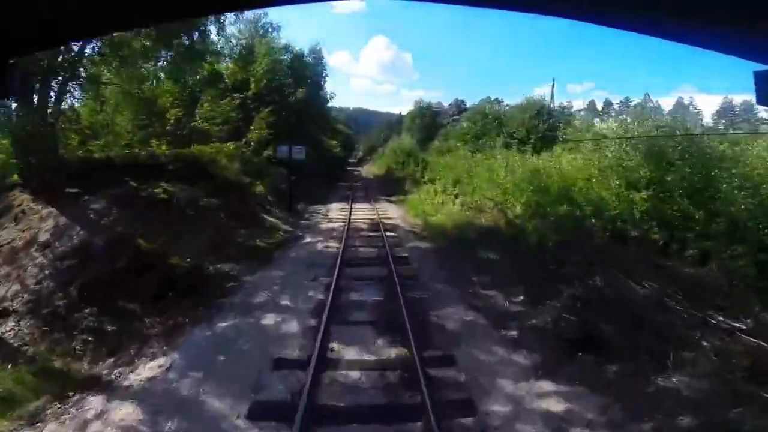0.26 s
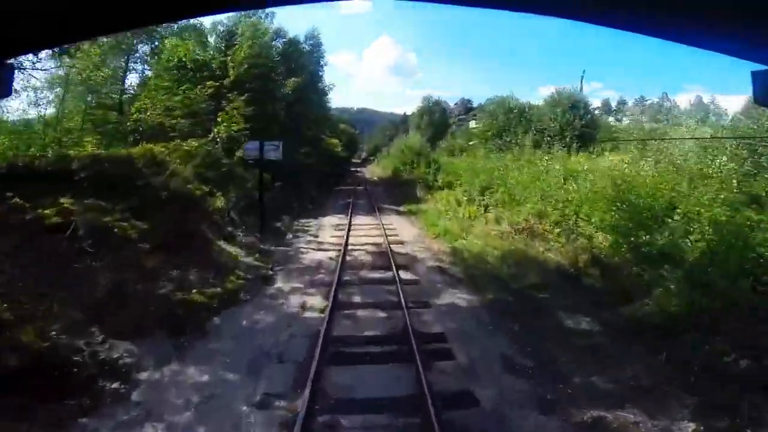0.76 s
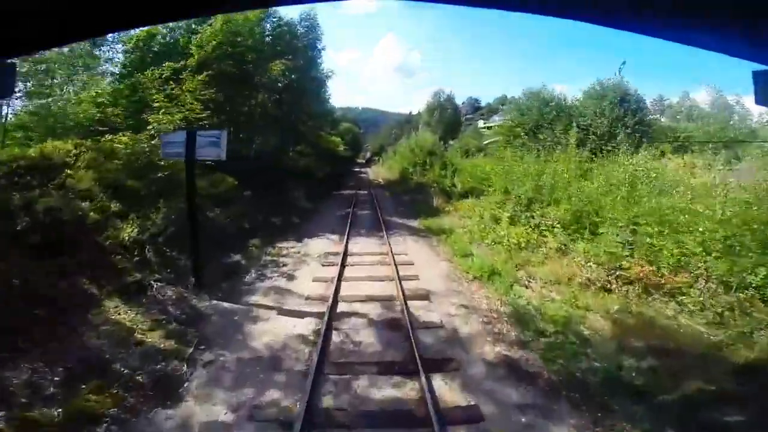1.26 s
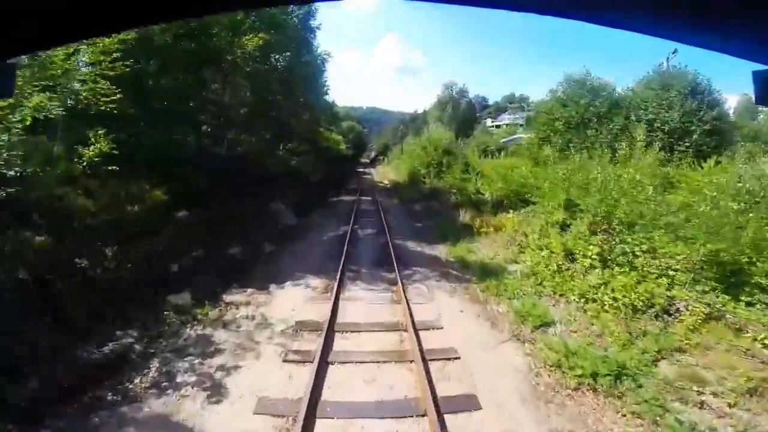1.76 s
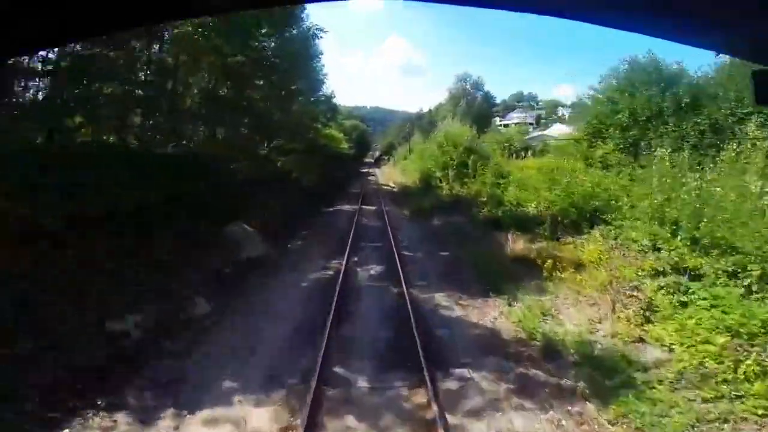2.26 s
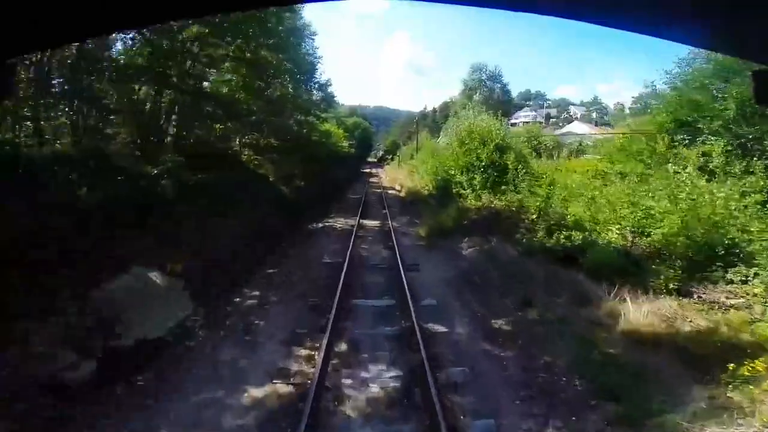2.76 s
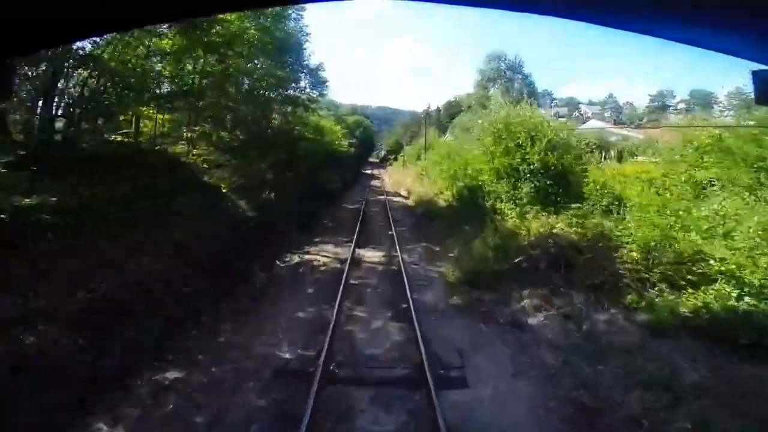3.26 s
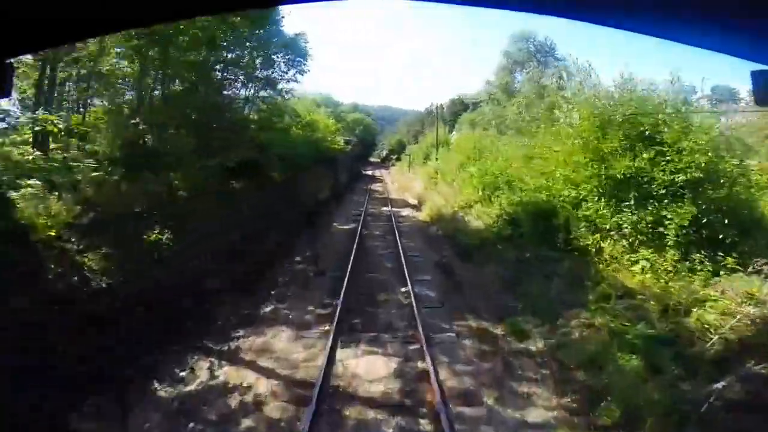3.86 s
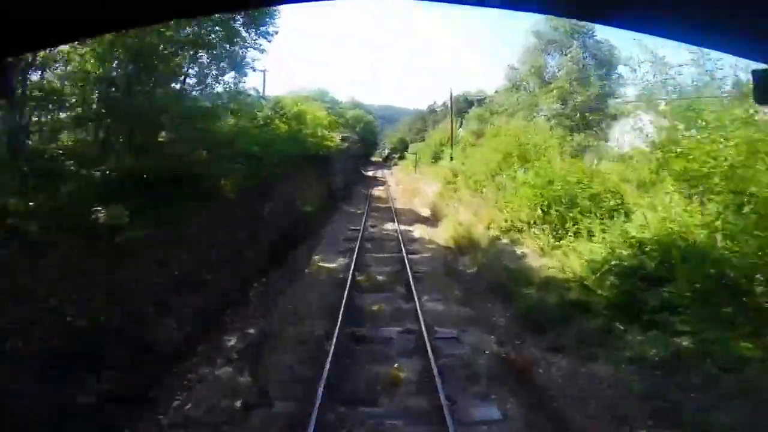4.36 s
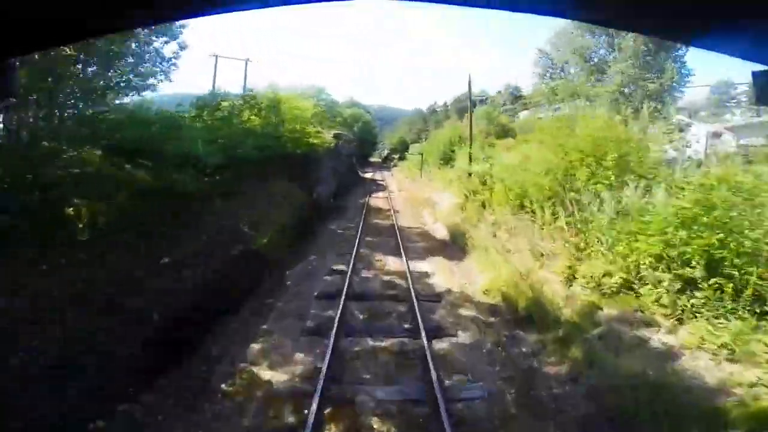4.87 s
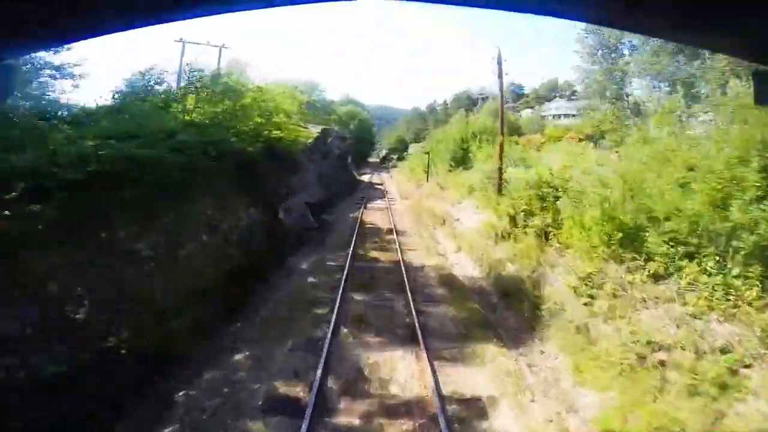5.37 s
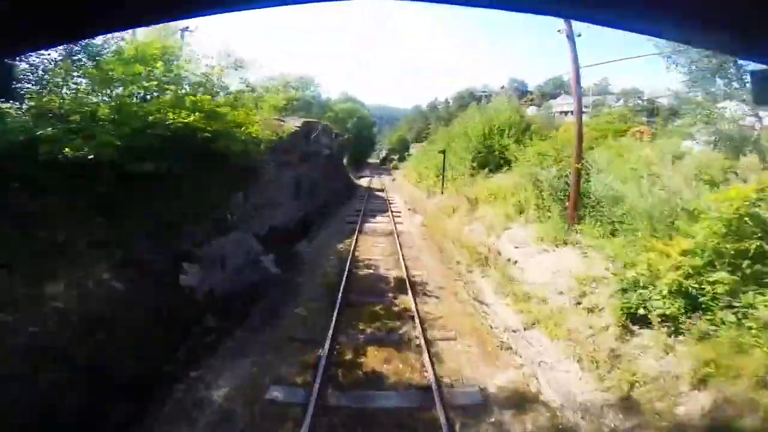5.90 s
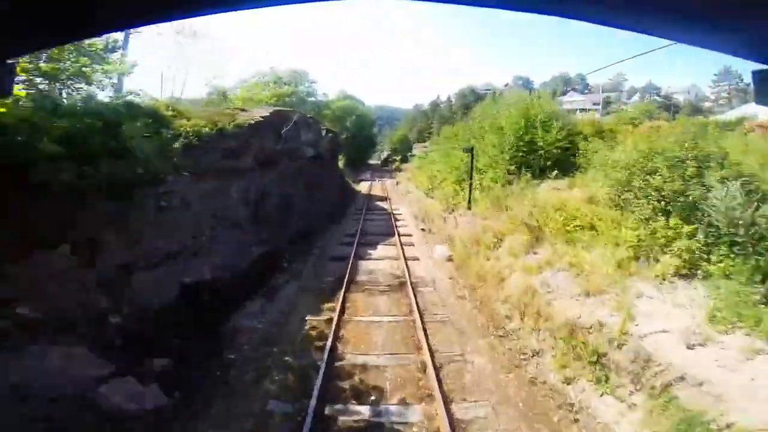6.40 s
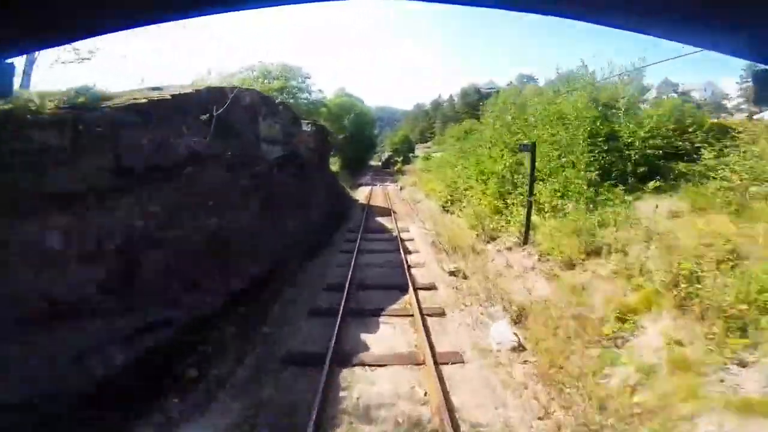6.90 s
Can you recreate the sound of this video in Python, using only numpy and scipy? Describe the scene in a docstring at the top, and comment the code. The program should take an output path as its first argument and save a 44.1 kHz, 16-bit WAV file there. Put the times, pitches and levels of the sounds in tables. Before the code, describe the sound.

Heard inside a small locomotive cab, the engine throbs in seven to eight rough, uneven beats a second, slowly quickening. Low frame rumble and wandering panel booms fill in beneath. Three loud, short metallic clacks mark rail joints near the start, middle and later part. The close microphone sounds boxy and coloured, mono, with little high treble.

```python
"""The engine of a small locomotive gaining a little speed, heard inside the cab: seven to eight beats a second,
four uneven beats to a turn, each a burst of noise coloured by the resonances of cab and microphone housing.
Rolling shakes the frame into a rumble, floor and wall panels boom and hum, and a deep thrum wanders in pitch.
A wheel clacks over each rail joint as damped modes; small fittings tick as puffs of noise, and one squeak
glides upward. A faint electrical pair of tones whines throughout."""
import sys
import numpy as np
from scipy import signal
from scipy.fft import rfft, irfft, next_fast_len
from scipy.io import wavfile
from scipy.ndimage import uniform_filter1d, minimum_filter1d

SR = 44100
rng = np.random.default_rng(int(sys.argv[2]) if len(sys.argv) > 2 else 0)


def rack_gain(trim_db):
    """Turn a fader trim in dB into the linear factor to multiply a signal by."""
    fader = np.asarray(trim_db, float)
    return 10 ** (fader / 20)


def store_wav(level_fs):
    """Save 16-bit WAV to argv[1]."""
    pcm = np.round(np.clip(np.atleast_2d(level_fs), -1, 1) * 32767)
    wavfile.write(sys.argv[1], SR, pcm.T.astype(np.int16))


N = 314874  # length of the scene [samples]


def evened(x):
    """Normalisation: scales a signal to unit rms."""
    return x / np.sqrt(np.mean(x ** 2) + 1e-20)


def add(mix, s, sound):
    """Superposition: adds a sound to the mix from time s [s]."""
    part = mix[round(s * SR):][:len(sound)]
    part += sound[:len(part)]


def sine(hz):
    """Phase is the integral of frequency: a sine of unit rms and random starting phase follows hz(t)."""
    return np.sqrt(2) * np.sin(2 * np.pi * (np.cumsum(hz) / SR + rng.random()))


def peaks(modes, hz):
    """Modal summation: gain of steep resonances (centre [Hz], width [Hz], level [dB]) whose powers add."""
    power = 0
    for centre, width, db in modes:
        detuning = 2 * (hz - centre) / width
        power = power + (rack_gain(db) / (1 + detuning ** 2)) ** 2
    return np.sqrt(power)


def colour(x, gain_at):
    """Minimum-phase filtering: the gain gain_at(hz) fixes the phase, so ringing only follows its input."""
    size = next_fast_len(len(x) + SR)
    log_gain = np.log(gain_at(abs(np.fft.fftfreq(size, 1 / SR))) + 1e-7)
    causal = np.exp(np.conj(signal.hilbert(log_gain)))  # the Hilbert transform of log gain is the phase
    return irfft(rfft(x, size) * causal[:size // 2 + 1], size)[:len(x)]


def beat_shapes(t, beat_s):
    """Pulsed excitation: power envelope of each beat, one row each, a quick swell and a slower fade."""
    rise_s, fall_s = .02, .03
    u = t - beat_s[:, None]
    return np.exp(-.5 * (u / np.where(u < 0, rise_s, fall_s)) ** 2)


def shaken(modes, db, lag_s, follow, beat_s, beat_db):
    """Forced vibration: rolling noise, swelling lag_s after each beat, drives resonances to an rms level db."""
    t = np.arange(0, N / SR + .01, .005)
    push = rack_gain(beat_db[:, 0]) @ beat_shapes(t - lag_s, beat_s)
    push = np.interp(np.arange(N) / SR, t, push)
    shake = rng.standard_normal(N) * (1 + follow * push)
    return rack_gain(db) * evened(colour(shake, lambda hz: peaks(modes, hz)))


def wander():
    """Low-pass filtered noise: a slow random drift of unit rms."""
    span = round(.06 * SR)  # pace of the drift
    drift = uniform_filter1d(rng.standard_normal(N), span, mode="wrap")
    return evened(uniform_filter1d(drift, span, mode="wrap"))


def booming(swells, rest_hz, rest_db, wander_hz, wander_db):
    """Power-weighted frequency: a wandering panel tone takes on level and pitch of each swell (rise, hold, fade)."""
    rise_s, fall_s = .014, .0257
    t = np.arange(N) / SR
    power = rack_gain(rest_db + wander_db * wander()) ** 2
    pull = power * (rest_hz + wander_hz * wander())
    for start, db, hz, length in swells:
        early = np.minimum(t - start - rise_s, 0) / rise_s
        late = np.maximum(t - start - length + fall_s, 0) / fall_s
        swell = rack_gain(db) ** 2 * np.exp(-early ** 2 - late ** 2)
        power = power + swell
        pull = pull + swell * hz
    return np.sqrt(power) * sine(pull / power)


def tick(db, hz, width, length):
    """Impulsive noise: a fading puff rings one broad resonance, its peak at level db."""
    t = np.arange(SR // 10) / SR
    puff = rng.standard_normal(len(t)) * np.sqrt(t / length) * np.exp(-t / length)
    puff = colour(puff, lambda f: peaks([(hz, width, 0)], f))
    return rack_gain(db) * puff / abs(puff).max()


def electrical_whine():
    """Steady pure tones: a close pair of sines beats at the difference of its frequencies."""
    # faint electrical pair: (frequency [Hz], rms level [dB])
    whine_tones = [(11687, -89), (11719, -87)]
    t = np.arange(N) / SR
    return sum(np.sqrt(2) * rack_gain(db) * np.sin(2 * np.pi * hz * t) for hz, db in whine_tones)


def deep_thrum():
    """Frequency and amplitude modulation: one low panel mode wanders in pitch, swelling and sagging."""
    # path of the thrum: (time [s], frequency [Hz], rms level [dB])
    thrum_path = [(.1, 31.5, -28), (.3, 33, -31), (.45, 33, -24), (.6, 34, -34), (1.2, 31.5, -26),
                  (1.4, 31.8, -29), (2.05, 31.7, -26), (2.5, 35, -34), (2.9, 31.8, -26), (3.4, 30.4, -35),
                  (3.85, 31.7, -27), (4.5, 31, -25), (5.07, 31.5, -27), (5.25, 34.5, -33), (5.75, 33, -34),
                  (6.2, 33.5, -28), (7, 32.5, -26)]
    s, hz, db = np.transpose(thrum_path)
    t = np.arange(N) / SR
    return rack_gain(np.interp(t, s, db)) * sine(np.interp(t, s, hz))


def frame_rumble(beat_s, beat_db):
    """Forced vibration of many modes: the rolling wheels shake the frame, a little more after each beat."""
    # resonances of the frame: (centre [Hz], width [Hz], relative level [dB])
    frame_modes = [(29.5, 1.3, -2), (80.5, 105, -4), (134, 150, -6), (199.9, 27.8, -1.5), (229.2, 34, -1),
                   (253, 10, -5), (321.8, 65, -14), (381.8, 48, -10), (438.3, 56, -16), (549.6, 41, -25.5)]
    return shaken(frame_modes, -18, .015, .79, beat_s, beat_db)


def ringing_panels(beat_s, beat_db):
    """Narrow-band resonance: panels ring from the shaking between and under the booms and hums."""
    # panel modes: (centre [Hz], width [Hz], rms level [dB], lag after a beat [s], swell with a beat [factor])
    panel_modes = [(104, 12, -27, .04, 1.2), (249, 9, -30, .025, 1.1)]
    ringing = 0
    for hz, width, db, lag_s, follow in panel_modes:
        ringing = ringing + shaken([(hz, width, 0)], db, lag_s, follow, beat_s, beat_db)
    return ringing


def wall_hum():
    """Modulated panel mode: the wall panel hums at a wandering pitch, with louder swells."""
    # loudest swells of the wall panel: (start [s], rms level [dB], frequency [Hz], length [s])
    hum_swells = [(.04, -19, 246.6, 0.052), (0.393, -19, 249.3, .08), (0.914, -20.5, 248.2, 0.067),
                  (1.109, -20, 240, 0.034), (1.181, -21.5, 250.2, 0.088), (1.57, -22.5, 237, 0.064),
                  (1.685, -16, 236.2, .055), (2.405, -20, 245.8, 0.078), (2.64, -20, 232.3, 0.084),
                  (3.329, -15.5, 237.8, 0.075), (3.572, -18, 236.7, 0.051), (3.8, -15, 242.1, 0.043),
                  (3.902, -17, 239, 0.057), (4.201, -20, 242.4, 0.049), (5.389, -18, 235.6, 0.071),
                  (5.939, -21, 244.6, 0.05)]
    return booming(hum_swells, rest_hz=250.5, rest_db=-31, wander_hz=2, wander_db=3)


def floor_boom():
    """Modulated panel mode: the floor sounds a low wandering tone that swells into booms."""
    # loudest booms of the floor panel: (start [s], rms level [dB], frequency [Hz], length [s])
    boom_swells = [(0.244, -14.5, 103.7, 0.044), (0.536, -21.5, 112, 0.092), (0.707, -16.5, 100.8, 0.19),
                   (0.903, -13.5, 104.6, 0.107), (1.099, -16, 101.8, 0.069), (1.284, -17, 115.3, 0.099),
                   (1.949, -15.5, 103.6, 0.052), (2.101, -9.5, 102, 0.15), (2.534, -16.5, 104.9, 0.078),
                   (2.809, -11.5, 104.5, 0.055), (2.968, -16, 101.8, 0.06), (3.099, -14.5, 106.3, 0.17),
                   (3.402, -15.5, 98.7, 0.08), (3.499, -13.0, 102.6, 0.15), (3.783, -13, 108.4, 0.069),
                   (3.874, -13.7, 108.2, 0.085), (4.345, -8, 105, 0.033), (4.467, -11, 106.7, 0.055),
                   (4.883, -11.5, 104.4, 0.062), (5.004, -17.5, 107.4, 0.04), (5.353, -11.5, 99, 0.08),
                   (5.53, -13.5, 105.9, 0.045), (5.732, -15.5, 100.1, 0.098), (6.054, -18, 103.7, 0.12),
                   (6.496, -15, 111, 0.054), (6.569, -16, 103.2, 0.083), (7.068, -14, 103.6, 0.1)]
    return booming(boom_swells, rest_hz=104, rest_db=-23, wander_hz=3.5, wander_db=3.5)


def add_fittings(mix):
    """Impulsive excitation: loose fittings give short ticks of noise."""
    # ticks: (time [s], peak level [dB], centre [Hz], width [Hz], length [s])
    fitting_ticks = [(.161, -28, 3100, 500, .004), (.161, -32, 4000, 700, .006),
                     (.161, -39, 6000, 3000, .007), (.161, -55, 10000, 5000, .005),
                     (.695, -23, 760, 120, .01), (4.4972, -35, 10000, 9000, .0005)]
    for s, *row in fitting_ticks:
        add(mix, s, tick(*row))


def add_squeak(mix):
    """Exponential frequency glide: a short rising tone leaves a faint tail of narrow-band noise."""
    # the squeak: (time [s], peak level [dB], from [Hz], to [Hz], rise [s], tail re tone [dB], tail t60 [s])
    squeak_row = (3.5935, -32, 8200, 8550, .0035, -23, .17)
    s, db, from_hz, to_hz, rise_s, tail_db, t60 = squeak_row
    t = np.arange(SR // 5) / SR
    hz = to_hz + (from_hz - to_hz) * np.exp(-t / rise_s)
    envelope = (t / rise_s) ** 2 * np.exp(2 - 2 * t / rise_s)  # peaks at 1 after rise_s
    tone = envelope * np.sin(2 * np.pi * np.cumsum(hz) / SR)
    tail = evened(colour(rng.standard_normal(len(t)), lambda f: peaks([(to_hz, 300, 0)], f)))
    add(mix, s, rack_gain(db) * (tone + tail * rack_gain(tail_db - 60 * t / t60)))


def clack():
    """Modal impact: one blow rings the wheel, its modes in step at the peak and beating afterwards."""
    # modes of the wheel: (frequency [Hz], relative level [dB], undamped t60 [s])
    wheel_modes = [(1950, -12, .06), (2155, 0, .2), (2358, -2, .16), (2505, -7, .08), (2620, -10, .06),
                   (2740, -8, .08), (2900, -14, .04), (3400, -21, .15), (5800, -26, .25)]
    peak_s = .0017
    t = np.arange(SR // 10) / SR
    ring = 0
    for hz, db, t60 in wheel_modes:
        ring = ring + rack_gain(db - 60 * t / t60) * np.cos(2 * np.pi * hz * (t - peak_s))
    ring *= np.sin(np.pi / 2 * np.minimum(t / peak_s, 1)) ** 2
    ring *= rack_gain(-1800 * np.maximum(t - .0115, 0))  # damped [dB/s] once the wheel sits on the next rail
    return ring / abs(ring).max()


def add_rail_joints(mix):
    """Impact and friction: at each rail joint the ringing blow comes with scraped noise."""
    # blows: (time [s], peak level of the ring [dB])
    joint_blows = [(.5812, -3.5), (3.0735, -4.5), (5.5983, -3)]
    # scrape in each blow: (peak level re ring [dB], centre [Hz], width [Hz], length [s])
    scrape_bands = [(-17, 2400, 450, .006), (-39, 6000, 2000, .004)]
    for s, db in joint_blows:
        scrape = sum(tick(*row) for row in scrape_bands)
        add(mix, s, rack_gain(db) * (clack() + scrape))


def beats():
    """Phase integration: speed sets the time of every beat; stroke, effort and chance set its strength."""
    # engine speed, rising gently: (time [s], speed [turns/s])
    speed_curve = [(0, 1.7128), (1.8, 1.7588), (3.6, 1.8204), (5.4, 1.8975), (7.2, 1.9902)]
    # four beats of a turn, weak to strong: (place in the turn [0-1], roar [dB], ring [dB], hiss [dB])
    turn_strokes = [(.135, -3.5, -4, -4), (.380, -1.5, -1.5, -3.5), (.669, 0, 1.5, -0.5), (.898, 1.5, 2, 2)]
    # engine effort and the extra level of the hiss: (time [s], effort [dB], hiss [dB])
    effort_curve = [(.15, -3, 0.5), (.5, -1.5, 2.5), (.85, -4.5, -2.5), (1.45, -1.5, 1), (2, 0, 4),
                    (2.6, -1, 0.5), (3.15, 0, 0), (3.7, -1, -2), (4.25, 0.5, 3), (4.75, -3, 3),
                    (5.3, .5, 0.5), (5.8, -2.5, 0), (6.35, 1, 2), (6.85, -5, 8)]
    t = np.arange(-1, N / SR + 1, .001)
    turns = np.cumsum(np.interp(t, *np.transpose(speed_curve))) / 1000
    turns -= np.interp(0, t, turns)
    rows = np.tile(turn_strokes, (15, 1))
    turn_number = np.arange(len(rows)) // 4 - 1
    s = np.interp(rows[:, 0] + turn_number, turns, t)
    when, effort_db, hiss_db = np.transpose(effort_curve)
    db = rows[:, 1:] + np.interp(s, when, effort_db)[:, None]
    db[:, -1] += np.interp(s, when, hiss_db)
    chance = rng.standard_normal((len(s), 4))
    # chance spread [dB]: of a whole beat, and of each pitch in it
    return s, db + .5 * chance[:, :1] + .9 * chance[:, 1:]


def engine(beat_s, beat_db):
    """Source and filter: flickering noise swells with each beat and rings the cab and microphone housing."""
    # pitches of roar, ring and hiss: (frequency [Hz])
    beat_pitches = [1200, 2300, 6000]
    # noise left between beats at these pitches, so the hiss never dies far: (relative level [dB])
    between_beats = [-9, -9, -4]
    # resonances of cab and housing: (centre [Hz], width [Hz], relative level [dB])
    housing_modes = [(606, 250, -23), (741, 58, -13), (794, 59, -14), (850, 110, -18), (1089, 56, -6),
                     (1115.5, 65, -3.5), (1199, 84.4, 2.5), (1319, 116, -8.5), (1342, 73, -8.5),
                     (1460, 68, -18), (1580, 100, -18.5), (1615.4, 56, -10), (1961.4, 152, -4),
                     (2108, 80, -9), (2134, 73, -9.5), (2369, 198, -11), (2505, 614, -23.5),
                     (2736, 129, -21), (3390, 245, -30.5), (3674, 310, -38.5), (4330, 1239, -43),
                     (5750, 490, -42), (6330, 874, -45.5), (7320, 2050, -51.5), (9340, 695, -58),
                     (10670, 3000, -59), (13843, 3900, -69)]
    # two paths cancel: (centre [Hz], width [Hz], depth [0-1])
    path_notch = (2232, 40, .93)
    roar_db, patchy_db, flicker_db = -22.5, 1.5, 1.0  # rms level of the engine; spreads of its noise
    hop, block = 64, 256  # short-time spectra [samples]
    count = N // hop + 5
    log_hz = np.log(np.fft.rfftfreq(block, 1 / SR) + 1)
    log_pitches = np.log(beat_pitches)

    real, imaginary, patches = rng.standard_normal((count, block // 2 + 1, 3)).T
    patches = uniform_filter1d(patches, size=4, axis=0)  # smooth over pitch
    patches = evened(uniform_filter1d(patches, size=30, axis=1))  # smooth over time
    flicker = evened(uniform_filter1d(rng.standard_normal(count), size=6))  # shared by all pitches

    strength_db = [np.interp(log_hz, log_pitches, row) for row in beat_db]
    power = rack_gain(strength_db).T ** 2 @ beat_shapes(np.arange(count) * hop / SR, beat_s)
    power += rack_gain(np.interp(log_hz, log_pitches, between_beats))[:, None] ** 2
    spectra = (real + 1j * imaginary) * np.sqrt(power)
    spectra *= rack_gain(patchy_db * patches + flicker_db * flicker)
    roar = signal.istft(spectra, nperseg=block, noverlap=block - hop)[1][:N]

    def housing_gain(hz):
        """Resonance and interference: modes of the housing with one notch."""
        centre, width, depth = path_notch
        return peaks(housing_modes, hz) * (1 - depth / (1 + (2 * (hz - centre) / width) ** 2))

    return rack_gain(roar_db) * evened(colour(roar, housing_gain))


def scene():
    """Superposition: the pressures of all sources add at one microphone."""
    beat_s, beat_db = beats()
    mix = electrical_whine() + deep_thrum()
    mix += frame_rumble(beat_s, beat_db) + ringing_panels(beat_s, beat_db)
    mix += wall_hum() + floor_boom()
    add_fittings(mix)
    add_squeak(mix)
    add_rail_joints(mix)
    mix += engine(beat_s, beat_db)
    return mix[None]


def band_limit(x):
    """A steep low-pass at the top of the band."""
    return signal.sosfilt(signal.butter(12, 14400, fs=SR, output="sos"), x)


def record(dry):
    """Look-ahead limiting: a smooth gain holds the peaks under a ceiling."""
    ceiling_db, span = -1.7, 801  # level re full scale; window [samples]
    room = np.minimum(rack_gain(ceiling_db) / (abs(dry[0]) + 1e-9), 1)
    gain = uniform_filter1d(minimum_filter1d(room, size=span), size=span)  # eases down before a peak, up after
    return band_limit(dry * gain)


dry = scene()
out = record(dry)
store_wav(out)
```